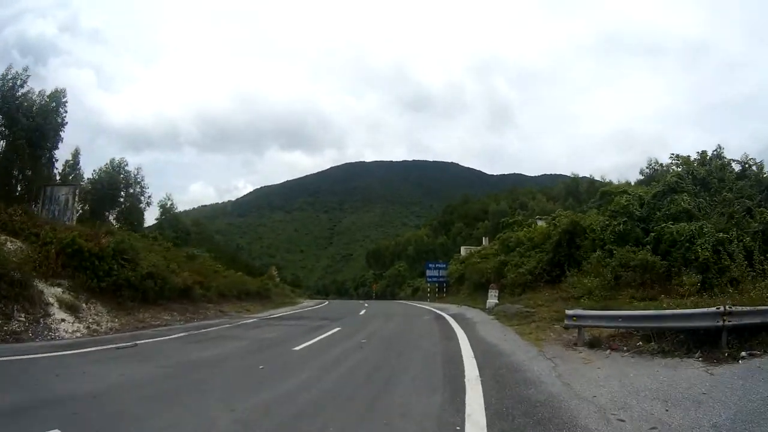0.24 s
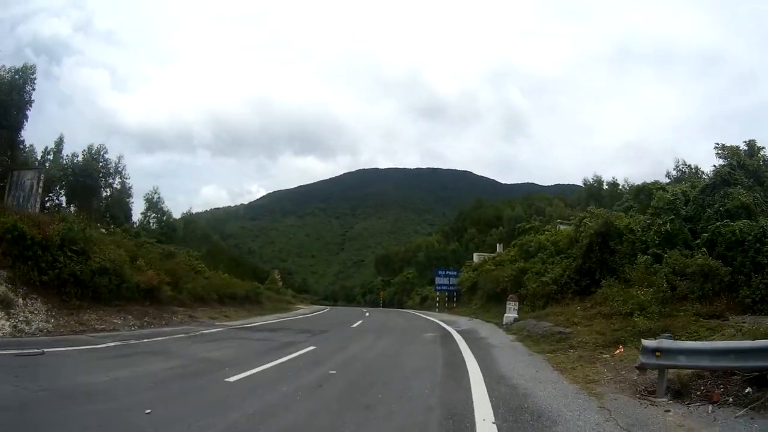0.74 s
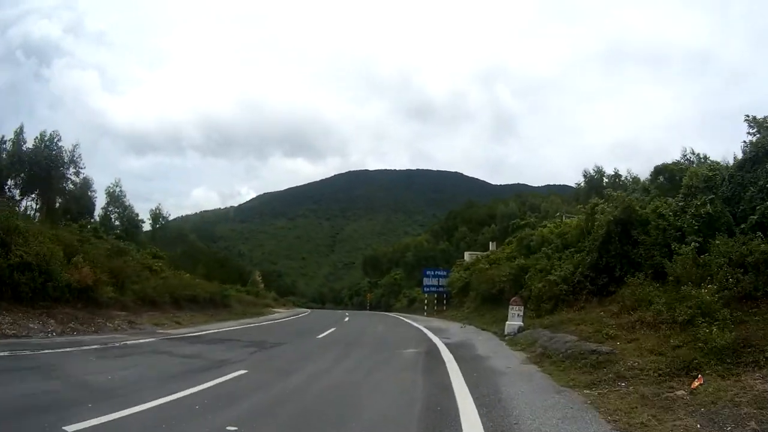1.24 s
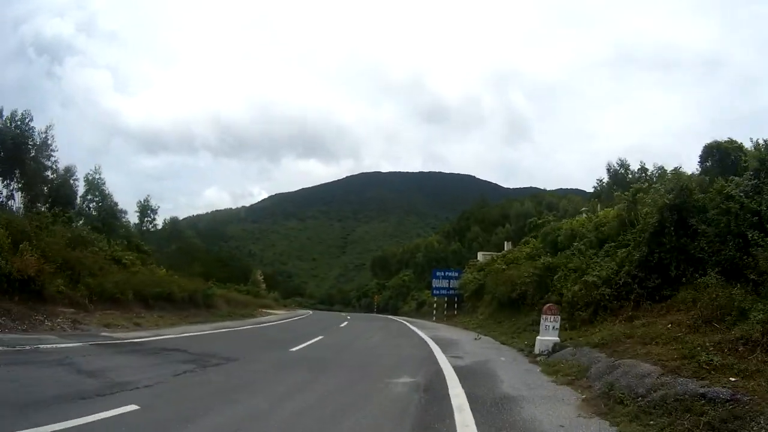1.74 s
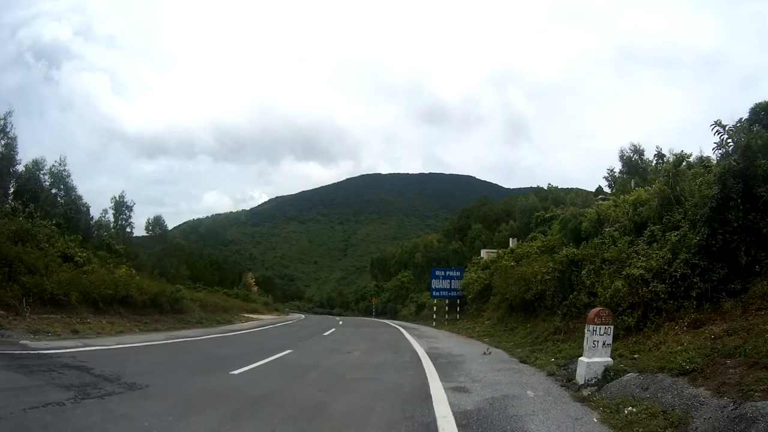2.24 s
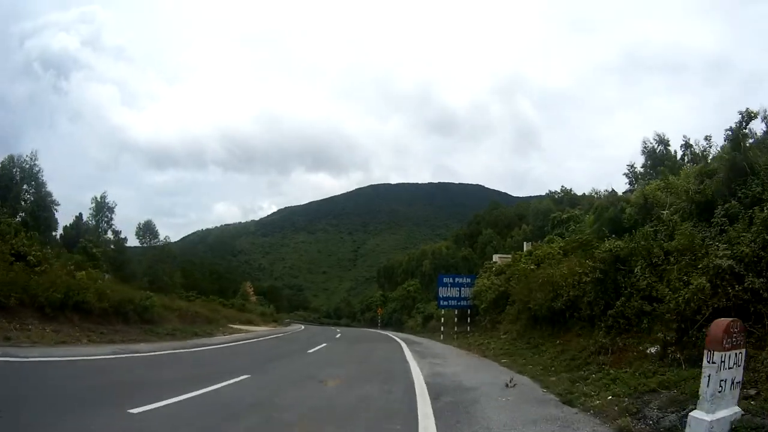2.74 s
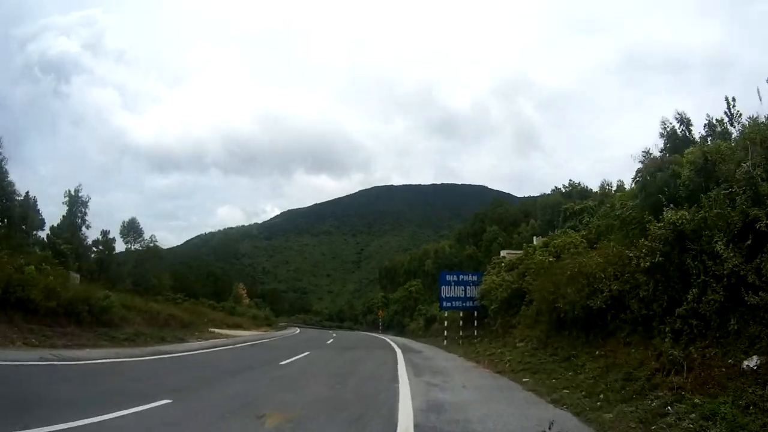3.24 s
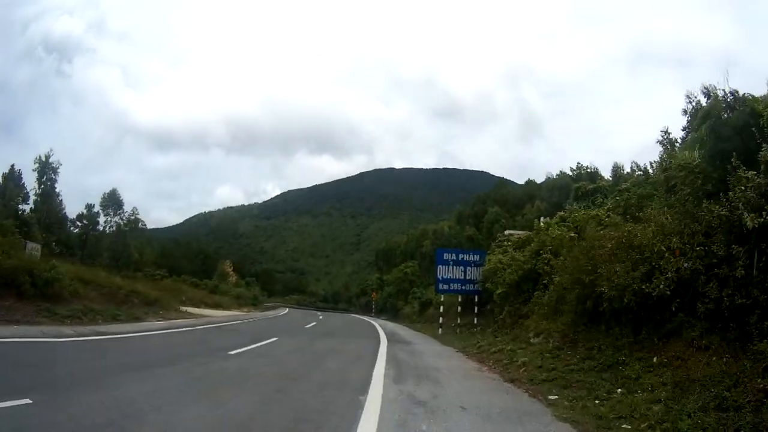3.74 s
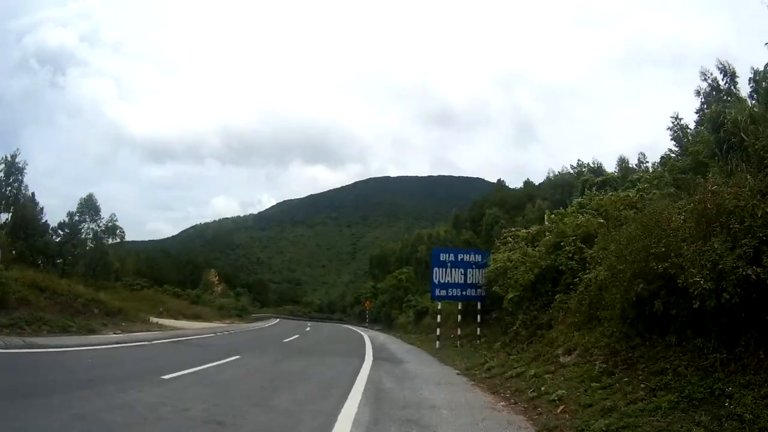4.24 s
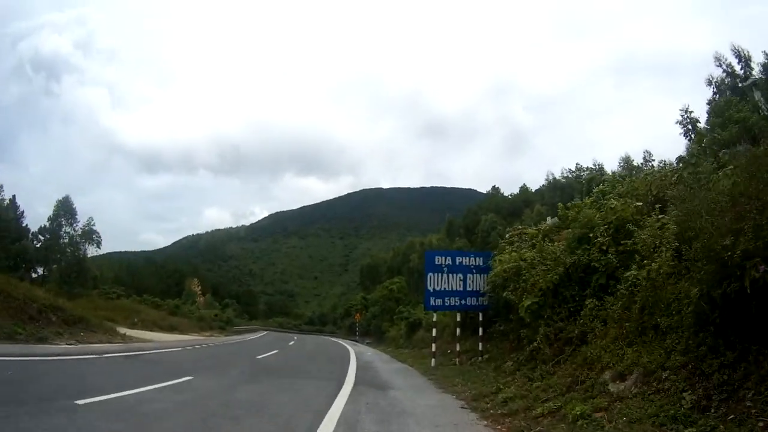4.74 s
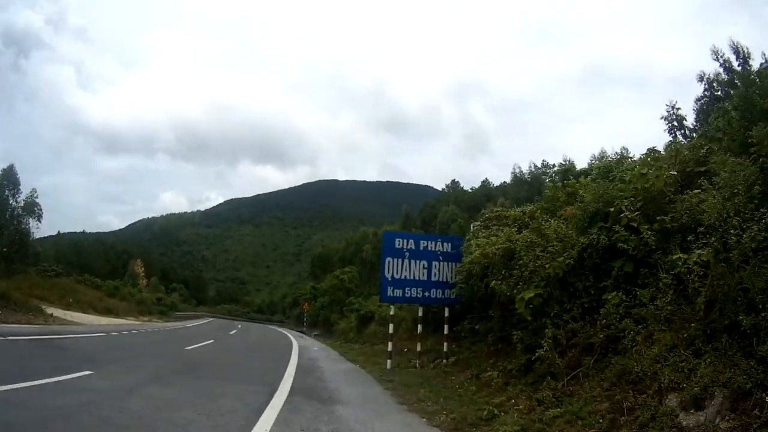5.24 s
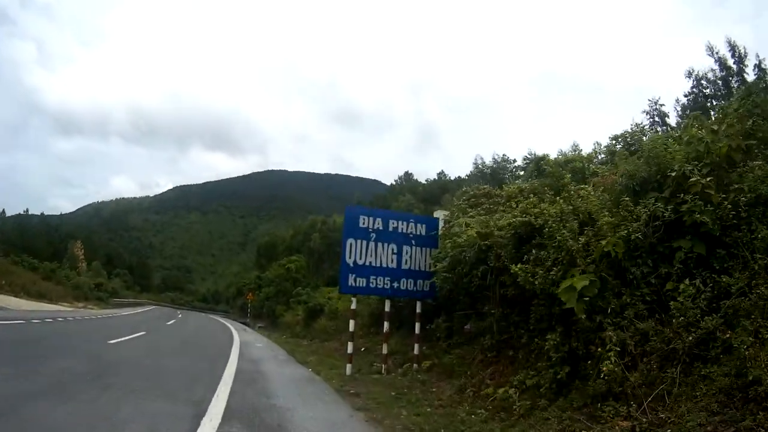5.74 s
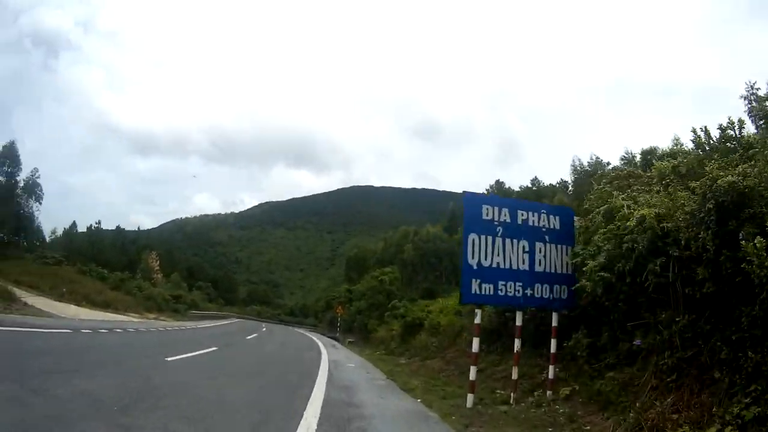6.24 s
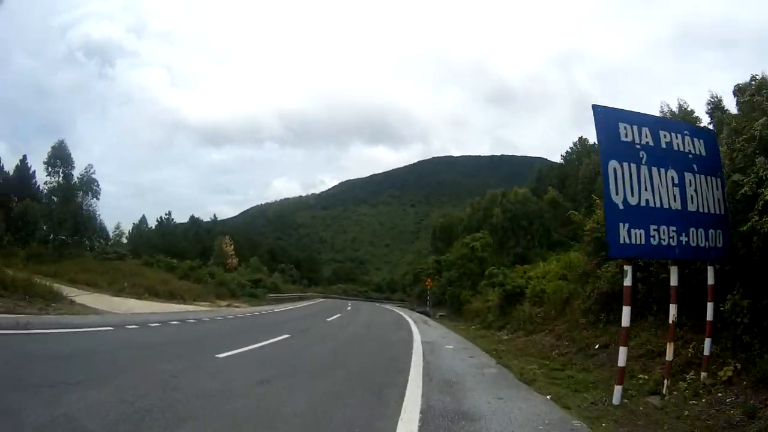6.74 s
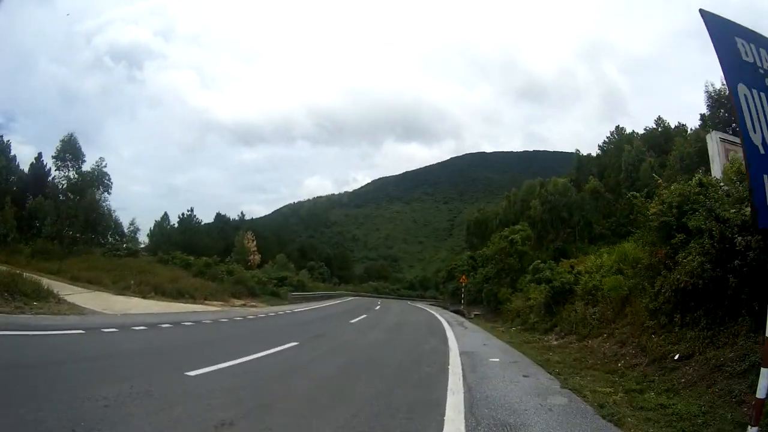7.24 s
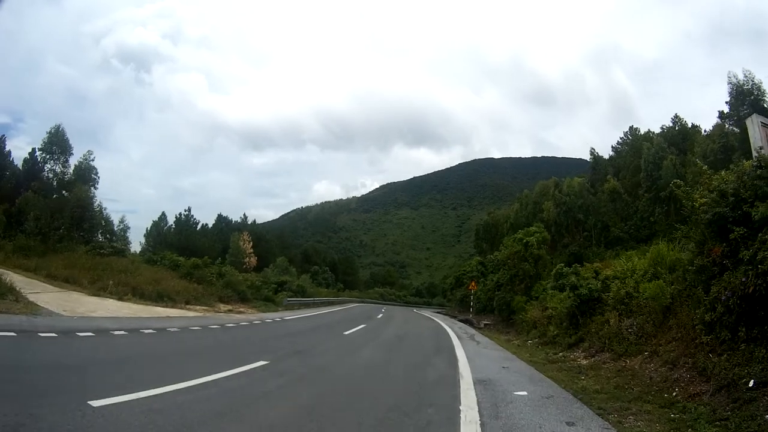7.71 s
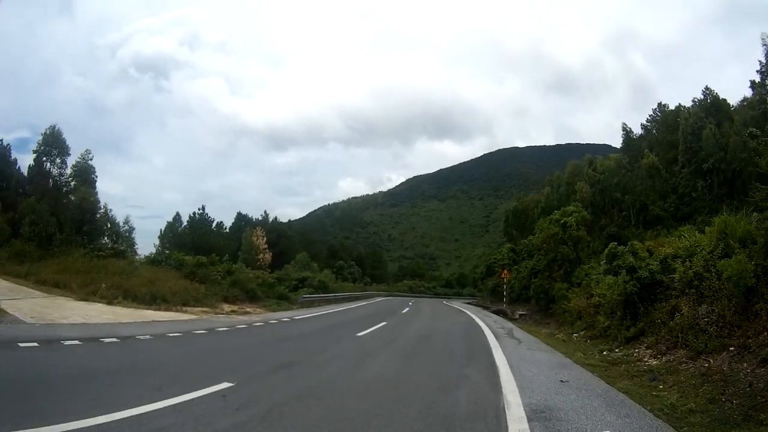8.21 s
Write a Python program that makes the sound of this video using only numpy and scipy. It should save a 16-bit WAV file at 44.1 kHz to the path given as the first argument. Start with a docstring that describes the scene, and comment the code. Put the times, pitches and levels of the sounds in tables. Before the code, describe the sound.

A single-cylinder motorcycle thuds along a hill road with low wind and tyre rush, eases off into a burble, then pulls away again.

```python
"""Motorcycle on a hill road

A single-cylinder motorcycle cruises along a hill road, heard from the saddle.
The exhaust thuds about twenty times a second, burbles when the throttle closes, then pulls again: sine packets.
Showers of impacts, coloured or rung through resonances, make the clatter; phase-locked sines make the gears.
Shaped noise and impacts make the rush of wind and tyres; decaying sines knock and tick.
Birds call by the road in short gliding whistles."""
import sys
import numpy as np
from scipy.fft import rfft, irfft, next_fast_len
from scipy.io import wavfile
from scipy.ndimage import uniform_filter1d, map_coordinates

SR = 44100
rng = np.random.default_rng(int(sys.argv[2]) if len(sys.argv) > 2 else 0)


def log_audio(samples):
    """Write samples as a 16-bit WAV file to the path given in sys.argv[1]."""
    # one column per channel
    frames = np.atleast_2d(samples).T
    # limit to full scale, then quantise
    limited = np.clip(frames, -1, 1)
    pcm = np.round(limited * 32767).astype(np.int16)
    wavfile.write(sys.argv[1], SR, pcm)


N = 373527  # length in samples


def amp(db):
    """Decibels to gain."""
    return 10 ** (np.asarray(db) / 20)


def unit(x):
    """Scale to rms 1."""
    return x / np.sqrt(np.mean(x ** 2) + 1e-20)


def curves(rows):
    """One value per sample for each column after the time."""
    s, *cols = np.transpose(rows)
    return [np.interp(np.arange(N) / SR, s, c) for c in cols]


def wobble(rate):
    """A smooth random curve, rate knots a second."""
    knots = rng.standard_normal(int(N * rate / SR) + 4)
    return map_coordinates(knots, [np.arange(N) * rate / SR])


def filtered(x, response):
    """Filter x by a complex response of frequency."""
    m = next_fast_len(len(x) + SR // 2)
    return irfft(rfft(x, m) * response(np.fft.rfftfreq(m, 1 / SR)), m)[:len(x)]


def coloured(x, points):
    """Equalise x by (f/Hz, level/dB) points on a log axis, at rms 1."""
    f, db = np.transpose(points)
    return unit(filtered(x, lambda hz: amp(np.interp(np.log(hz + 1), np.log(f), db))))


def resonate(x, modes):
    """Ring x through steep-sided (f/Hz, half width/Hz, level/dB) resonances, at rms 1."""
    def response(f):
        total = 0
        for centre, width, db in modes:
            band = 2j * f * width / (centre * centre - f * f + 2j * f * width)
            total = total + amp(db) * band ** 2
        return total
    return unit(filtered(x, response))


def noise():
    """White noise with a standard deviation of 1."""
    return rng.standard_normal(N)


def add(track, s, sound):
    """Mix a sound into the track from time s."""
    start = max(round(s * SR), 0)
    track[start:start + len(sound)] += sound[:max(N - start, 0)]


# Engine speed: (t/s, firing rate/Hz)
FIRING_RATE = [(0.0, 20.705), (0.9, 20.653), (2.0, 20.034), (3.0, 19.335), (3.3, 18.669), (3.6, 16.385),
               (3.9, 16.797), (4.3, 15.852), (4.8, 15.359), (5.2, 13.804), (5.6, 14.664), (6.0, 13.818),
               (6.5, 15.552), (6.7, 17.963), (7.15, 20.518), (8.47, 20.692)]


def engine_cycles():
    """Four-stroke cycles, counted by summing the firing rate; the exhaust opens at whole numbers."""
    return .23 + np.cumsum(curves(FIRING_RATE)[0]) / SR


# Throttle opening: (t/s, opening 0-1)
THROTTLE_OPENING = [(3.2, .95), (3.5, .1), (4.8, .1), (5.1, .3), (6.35, .42), (6.7, .88), (7.1, .98)]


def throttle_opening():
    """How far the throttle is open, from shut at 0 to full at 1."""
    return np.clip(curves(THROTTLE_OPENING)[0], 0, 1)


FULL_PULL = 8  # gain in firing rate at full pull, Hz per second


def pull():
    """How hard the engine is gaining speed on an open throttle, 0-1."""
    gain = np.gradient(uniform_filter1d(curves(FIRING_RATE)[0], SR // 6)) * SR
    return np.clip(gain / FULL_PULL, 0, 1) * throttle_opening()


def around(cycle, place, width):
    """A soft gate at one place in every cycle."""
    return np.exp(-(((cycle - place + .5) % 1 - .5) / width) ** 2)


def strokes(cycle, share, count=160, size=20):
    """Impacts near the same crank angles in every cycle, slowly changing in strength, mixed with loose ones."""
    turns = np.arange(-1, int(cycle[-1]) + 1)[:, None] + rng.random(count)
    strength = uniform_filter1d(rng.standard_normal(turns.shape), size, axis=0, mode="wrap")
    at = np.interp(turns, cycle, np.arange(N), left=-SR, right=-SR)
    at = at + .0001 * SR * rng.standard_normal(turns.shape)  # timing scatter of 0.1 ms
    heard = (at >= 0) & (at < N)
    regular = unit(np.bincount(at[heard].astype(int), strength[heard], N))
    return np.sqrt(share) * regular + np.sqrt(1 - share) * noise()


def clatter(cycle, throttle, regular, coast_depth=0.71, load_depth=0.098, width=0.16, delay=0.079,
            grain_db=1.0, rebound=.12):
    """Tiny impacts that crowd after each firing, most when the drive is slack, and again a crank turn later."""
    after_firing = around(cycle, delay, width)
    turn_later = around(cycle, delay + .5, width)
    depth = load_depth * throttle + coast_depth * (1 - throttle)
    swing = 1 + depth * after_firing + rebound * turn_later
    swing = swing / (1 + (depth + rebound) * after_firing.mean())  # keeps the average level steady
    return strokes(cycle, regular) * amp(grain_db * wobble(260)) * swing


def bird(start, gap, hz, db, count, length, fall, soft_db, flat, waver, warm_s=0.057):
    """Evenly spaced sine whistles, each slurring downward; the first ones can be soft and a little flat."""
    out, u = np.zeros(N), np.arange(0, 1, 1 / (length * SR))
    for s in gap * np.arange(count):
        shy = np.exp(-(s / warm_s) ** 2)
        quiver = waver * np.interp(u, np.linspace(0, 1, 12), rng.standard_normal(12))
        pitch = hz * (1 - flat * shy) * rng.normal(1, .007) * (1 - fall * u ** 3 + quiver)
        note = np.sin(np.pi * u) * np.sin(2 * np.pi * np.cumsum(pitch) / SR)
        add(out, start + s, amp(db + soft_db * shy + rng.normal(0, 1)) * note)
    return out


# A farther bird's peeps: start of each, t/s
PEEP_TIMES = [4.345, 4.785, 4.995, 5.235, 5.47, 5.675]


def far_peeps():
    """Single thin whistles, each falling slightly in pitch."""
    return sum(bird(s, gap=0, hz=4730, db=-75.5, count=1, length=.028, fall=.05,
                    soft_db=0, flat=0, waver=.02) for s in PEEP_TIMES)


def near_trill():
    """A nearby bird's quick run of slurred whistles, opening softly."""
    return bird(4.955, gap=.035, hz=3380, db=-64.5, count=13, length=.0235, fall=.13,
                soft_db=-12, flat=.04, waver=.005)


# Steady buffeting: (t/s, level/dB)
BUFFET_LEVEL = [(0, -56), (3.2, -46.5), (4.8, -53.5), (5.15, -54), (8.45, -51)]
# Gusts on the microphone: (crest t/s, half length/s, level/dB over the steady buffeting)
GUST_SWELLS = [(.5, 0.66, 10.5), (2.348, 0.18, 9.5), (3.603, 0.16, 8), (4.05, .2, 4), (4.75, 0.29, 10)]
# Spectrum of the buffeting: (f/Hz, relative level/dB)
BUFFET_COLOUR = [(12, -17), (25, -9), (45, 7.5), (65, 0), (110, -0.5), (200, -7), (500, -55), (2000, -120)]


def wind():
    """Lumpy low buffeting of air at the microphone, swelling in gusts."""
    t = np.arange(N) / SR
    gust_db = sum(db * np.exp(-((t - s) / half) ** 2) for s, half, db in GUST_SWELLS)
    level_db = curves(BUFFET_LEVEL)[0] + gust_db + 2.0 * wobble(8.8)
    return amp(level_db) * coloured(noise(), BUFFET_COLOUR)


# Rush of air and tyres: (t/s, level/dB)
RUSH_LEVEL = [(0, -37), (1.4, -38), (1.65, -39), (3.2, -41), (3.7, -45), (4.8, -47), (5.05, -51.5),
              (6.5, -55.5), (8.45, -46.5)]
# Spectrum of the rush: (f/Hz, relative level/dB)
TYRE_COLOUR = [(20, -33), (60, -0.5), (110, 2), (200, -1), (300, -3), (420, -9), (550, -13.5),
               (1000, -17.5), (2500, -65), (6000, -100)]


def road(cycle, throttle):
    """A low rush of tyres and frame that throbs with the engine."""
    impacts = clatter(cycle, throttle, regular=1 / 10, coast_depth=1.7, grain_db=0.3)
    return amp(curves(RUSH_LEVEL)[0] + 1.08 * wobble(13)) * coloured(impacts, TYRE_COLOUR)


def struck(hits, modes):
    """Each blow sets off decaying sines at slightly new pitches and strengths."""
    out, t = np.zeros(N), np.arange(SR // 20) / SR
    for s, db in hits:
        for hz, level, t60 in modes:
            decay = amp(db + level + rng.normal(0, 1) - 60 * t / t60)
            add(out, s, decay * np.sin(2 * np.pi * hz * rng.normal(1, 0.024) * t))
    return out


# Sharp ticks close by: (t/s, level/dB)
TICK_HITS = [(1.974, -48), (6.461, -28.5), (7.259, -46)]
# Modes of the small hard part that ticks: (f/Hz, relative level/dB, t60/s)
TICK_MODES = [(640, -4, 0.01), (1050, -13, 0.0073), (1500, -20, 0.0057), (2500, -19, 0.0077),
              (4300, -24, .004), (6100, -21, 0.004), (10200, -11.5, 0.0037), (11500, -20, .006)]


def ticks():
    """A small hard part rings for a few milliseconds at each tick."""
    return struck(TICK_HITS, TICK_MODES)


# Loose parts knocking over bumps: (t/s, level/dB before the dulling filter)
KNOCK_HITS = [(.824, -20), (3.854, -24), (4.8895, -25), (5.577, -31.5), (7.839, -37)]
# Modes of the loose parts: (f/Hz, relative level/dB, t60/s)
FITTING_MODES = [(510, -4, 0.014), (1090, -10, 0.022), (1280, -25, 0.021), (1540, -19, 0.021),
                 (3960, -17, .014), (5400, -5, 0.015)]


def knocks():
    """Loose parts knock over bumps; padded contacts sound dull."""
    return filtered(struck(KNOCK_HITS, FITTING_MODES), lambda hz: 1 / np.sqrt(1 + (hz / 1900) ** 8))


# Valves seating: (place in the cycle 0-1, level/dB at full throttle)
VALVE_SEATING = [(.2, -82), (.44, -87.5)]
# What the valves ring with: (f/Hz, half width/Hz, relative level/dB)
VALVE_MODES = [(3930, 370, 3), (5220, 440, 0)]


def valves(cycle, throttle, width=0.021):
    """Under load the valves tick unevenly, twice in each cycle: gated noise through two resonances."""
    uneven = amp(1.5 * wobble(20))
    seats = 0
    for place, db in VALVE_SEATING:
        burst = around(cycle, place, width) * noise()
        seats = seats + amp(db) * resonate(burst, VALVE_MODES)
    return throttle * uneven * seats


def air_box():
    """The air box hums with its own hollow note: noise through one resonance."""
    hollow = resonate(noise(), [(446, 37, 0)])
    return amp(-51 + 0.27 * wobble(2.79)) * hollow


def whine(turns, flutter_db=2):
    """A meshing tone whose strength and phase waver with the play between the teeth."""
    slip = .32 * wobble(16)
    return amp(flutter_db * wobble(11)) * np.sin(2 * np.pi * turns + slip)


# Casing resonances, also rung by the clatter: (f/Hz, half width/Hz, relative level/dB)
CASING_MODES = [(651.3, 29.4, -2.5), (828.5, 28, -4.5), (1124, 78, -3.5), (1278.4, 37, -2.5),
                (3800, 84, -35.5), (5210, 250, -40)]
# Level of the casing clatter, which the whine follows: (t/s, level/dB)
CLATTER_LEVEL = [(0, -44), (1.6, -45), (1.85, -42.5), (3.1, -42.5), (3.55, -48.5), (5.5, -50), (6.45, -51),
                 (7.2, -42.5), (8.45, -41)]
# Timing gear tones: (multiple of the firing rate, relative level/dB)
TIMING_TONES = [(31, -6), (32, -4), (33, 4), (40, -11), (41.5, -.5), (62, -13), (63, -10), (65.5, -6)]
TIMING_DB, TIMING_RISE_DB = -16, 2.5  # direct tone against the clatter curve; casing ring against the tone


def timing_gears(cycle, throttle):
    """Gear tones follow the engine speed and swell at the casing's resonances."""
    mesh = unit(sum(amp(db) * whine(multiple * cycle) for multiple, db in TIMING_TONES))
    timing = mesh + amp(TIMING_RISE_DB) * resonate(mesh, CASING_MODES)
    return amp(TIMING_DB + curves(CLATTER_LEVEL)[0]) * throttle * timing


# Taking up the load: start and stage lengths, s
DRIVE_START_S, DRIVE_ATTACK_S, DRIVE_HOLD_S, DRIVE_RELEASE_S = 6.8, .2, .58, .25
DRIVE_DB, DRIVE_SETTLED_DB = -45, -50.5  # sine peak at the height and once settled, before flutter


def drive_gear(cycle):
    """The drive gear sings out as it takes load again, then settles."""
    stages = np.cumsum([DRIVE_START_S, DRIVE_ATTACK_S, DRIVE_HOLD_S, DRIVE_RELEASE_S])
    gains = [0, amp(DRIVE_DB), amp(DRIVE_DB), amp(DRIVE_SETTLED_DB)]
    take_up = np.interp(np.arange(N) / SR, stages, gains)
    return take_up * whine(23.2 * cycle, flutter_db=1.5)


# Casing spectrum under load, shared with the combustion knock: (f/Hz, relative level/dB)
LOADED_COLOUR = [(140, -19), (235, -2.5), (330, 1.5), (450, -2), (560, -2), (730, -5.5), (950, -7.5),
                 (1310, -8.5), (1430, -12.5), (1750, -10), (2020, -22.5), (2350, -22), (3000, -39),
                 (4300, -40.5), (7000, -52)]
# Casing spectrum while coasting: (f/Hz, relative level/dB)
COASTING_COLOUR = [(140, -22), (240, -12), (330, 4), (400, -6), (590, 0), (730, -7), (890, -1), (1030, -6),
                   (1310, -5), (1430, -11), (1750, -11.5), (2020, -22.5), (2450, -23.5), (3000, -37),
                   (7000, -47)]


def casing(cycle, throttle):
    """Impacts ring the casing; its colour crossfades between coasting and load as the throttle moves."""
    body = coloured(clatter(cycle, throttle, regular=0.39), LOADED_COLOUR)
    ring = resonate(clatter(cycle, throttle, regular=0.47), CASING_MODES)
    loaded = amp(-1) * body + amp(-4.5) * ring
    slack = clatter(cycle, throttle, regular=1 / 3, coast_depth=0.33)
    coasting = amp(3.0) * coloured(slack, COASTING_COLOUR)
    level_db = curves(CLATTER_LEVEL)[0] + 0.75 * wobble(14)
    return amp(level_db) * (np.sqrt(throttle) * loaded + np.sqrt(1 - throttle) * coasting)


def combustion(cycle, lead=.04, width=.13):
    """While the engine pulls, each firing knocks on the casing just before the exhaust opens."""
    knock = around(cycle, -lead, width) * strokes(cycle, .7)
    return amp(-52) * pull() * coloured(knock, LOADED_COLOUR)


# Firings that barely catch: (t/s, change of level/dB)
WEAK_FIRINGS = [(1.05, -5), (3.67, -8), (4.99, -10), (5.06, -2), (5.34, -6), (5.41, -7), (5.48, -3),
                (6.05, -9)]


def misfire_db(index):
    """Change of level through each cycle whose charge barely catches."""
    return sum(db * (index == index[round(s * SR)]) for s, db in WEAK_FIRINGS)


def packet(u, hz, width):
    """One pressure pulse: a sine under a bell-shaped swell."""
    return -np.sin(2 * np.pi * hz * u) * np.exp(-(u / width) ** 2)


CRUISE_RATE = 20.6  # firing rate at cruise, Hz
# Level at cruise, and its changes per halving of engine speed, with the throttle shut and at full pull, dB
EXHAUST_DB, EXHAUST_SLOW_DB, EXHAUST_SHUT_DB, PULL_DB = -36.5, -10.5, -.5, 2.5


def exhaust(cycle, throttle, pipe_hz=121, swell=.0074, sag=.25, puff_hz=104, puff_swell=.0052,
            lag=.0142, push=.7, jitter=.0008, size_db=.7):
    """One muffled thud per firing; a shut throttle deepens it, and the piston pushes out a second puff."""
    firing_rate = curves(FIRING_RATE)[0]
    index = np.round(cycle - .1).astype(int)
    chance = rng.standard_normal((index.max() + 1, 4))[index].T  # new draws for every firing
    shut = 1 - throttle
    wander = jitter * shut ** 2
    t = (cycle - index) / firing_rate - .0003 - wander * chance[0]
    droop = 1 - sag * shut ** 4
    thud = packet(t, pipe_hz * droop, swell * droop)
    second = push * np.clip((shut - .1) / .5, 0, 1) * amp(1.5 * chance[1])
    puff = second * packet(t - lag - wander * chance[2], puff_hz, puff_swell)
    pulses = (thud + puff) * amp(size_db * chance[3])
    train = filtered(pulses, lambda hz: 1 / np.sqrt(1 + (hz / 235) ** 12))  # the silencer passes only bass
    strength = np.sqrt(np.abs(uniform_filter1d(train ** 2, SR // 2)) + 1e-9)  # rms over half a second
    halvings = np.log2(CRUISE_RATE / firing_rate)
    level_db = EXHAUST_DB + EXHAUST_SLOW_DB * halvings + EXHAUST_SHUT_DB * shut
    level_db = level_db + PULL_DB * pull() + misfire_db(index)
    return train / strength * amp(level_db)


def scene():
    """Roadside, air and engine at one microphone."""
    cycle, throttle = engine_cycles(), throttle_opening()
    roadside = far_peeps() + near_trill()
    air = wind() + road(cycle, throttle)
    loose_parts = ticks() + knocks()
    gears = timing_gears(cycle, throttle) + drive_gear(cycle)
    engine = valves(cycle, throttle) + air_box() + gears + casing(cycle, throttle) + combustion(cycle)
    return (roadside + air + loose_parts + engine + exhaust(cycle, throttle))[None]


# Spectrum of the microphone hiss: (f/Hz, relative level/dB)
HISS_COLOUR = [(1000, 4), (6000, -0.5), (8500, -1), (10500, -1), (14500, -1.5), (15700, -6.5)]
TOP_HZ = 15750  # band limit


def record(dry):
    """The microphone adds a faint hiss, and nothing is kept at or above the band limit."""
    hiss = amp(-72.5) * coloured(noise(), HISS_COLOUR)
    return filtered(dry[0] + hiss, lambda hz: hz < TOP_HZ)[None]


dry = scene()
out = record(dry)
log_audio(out)
```